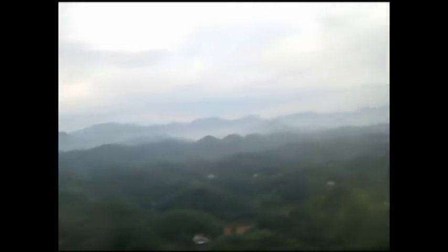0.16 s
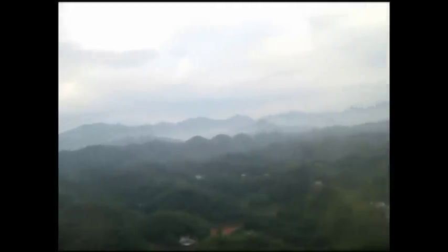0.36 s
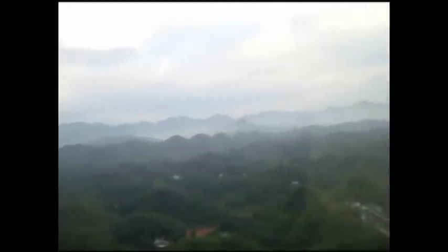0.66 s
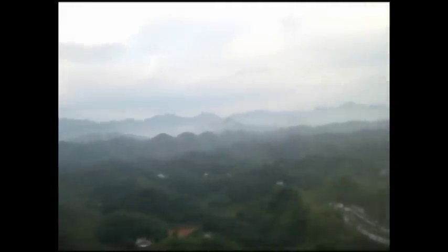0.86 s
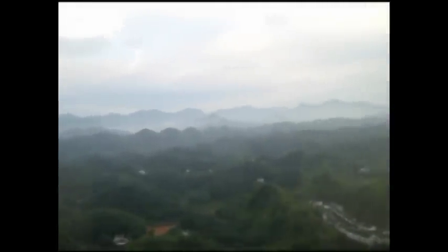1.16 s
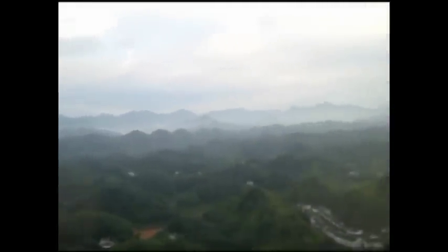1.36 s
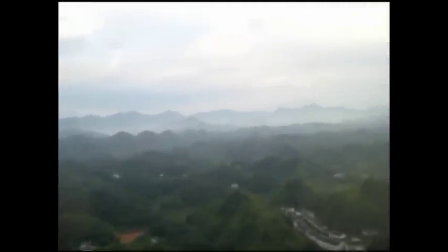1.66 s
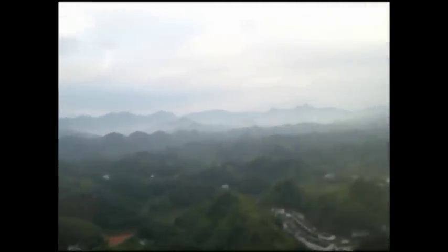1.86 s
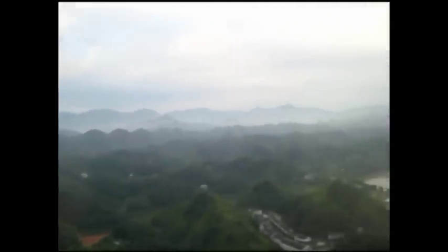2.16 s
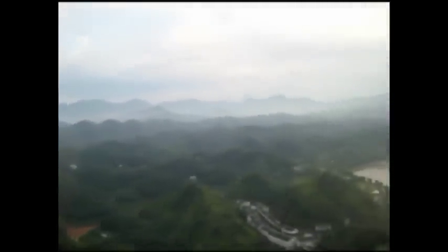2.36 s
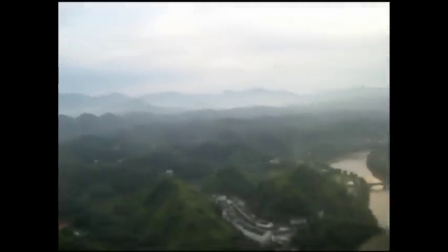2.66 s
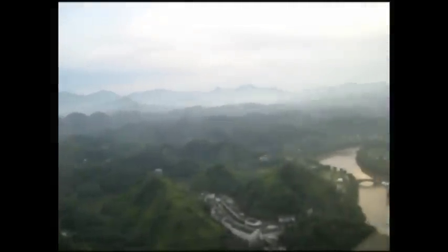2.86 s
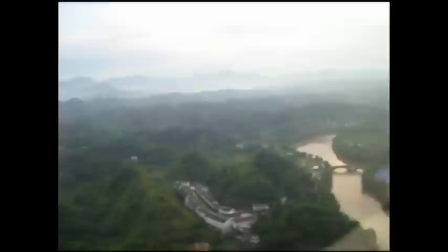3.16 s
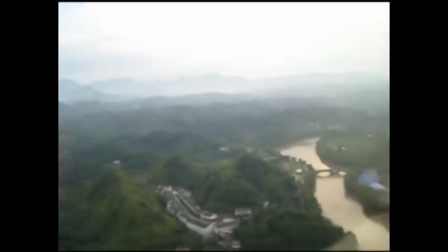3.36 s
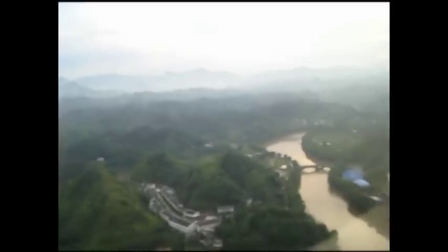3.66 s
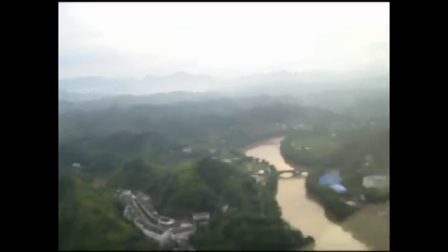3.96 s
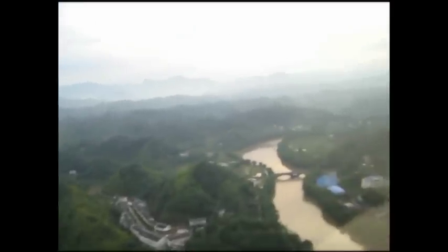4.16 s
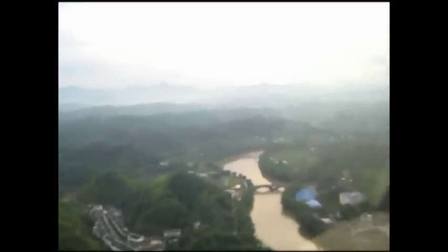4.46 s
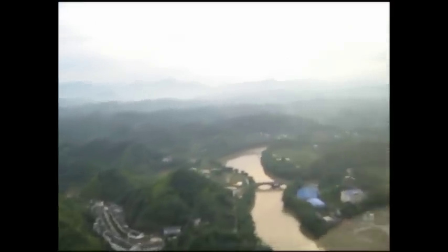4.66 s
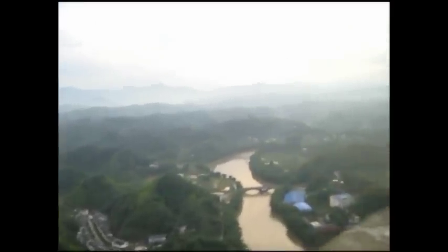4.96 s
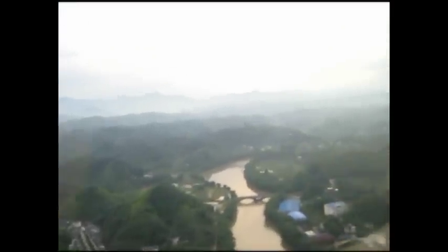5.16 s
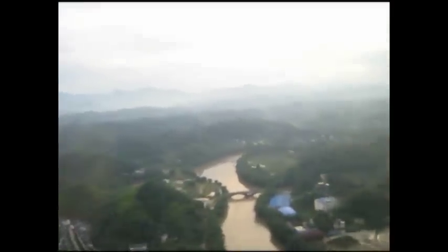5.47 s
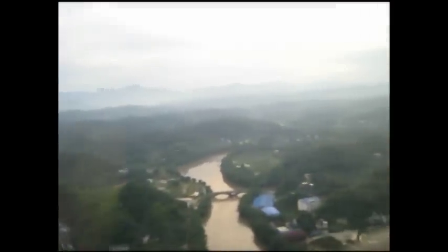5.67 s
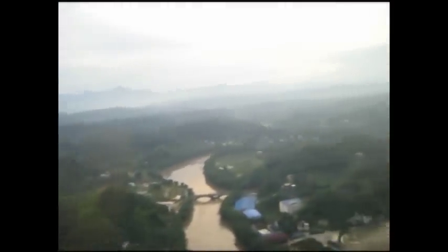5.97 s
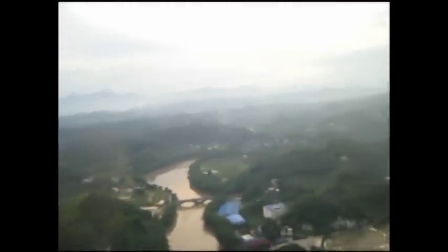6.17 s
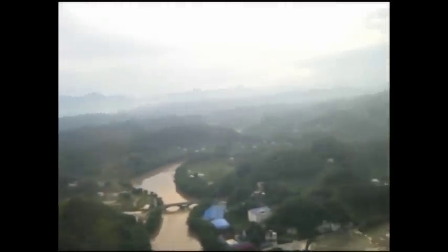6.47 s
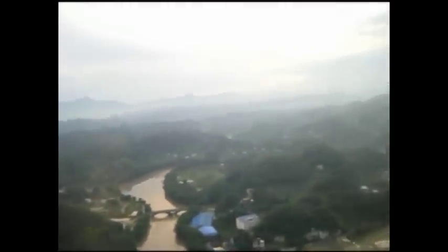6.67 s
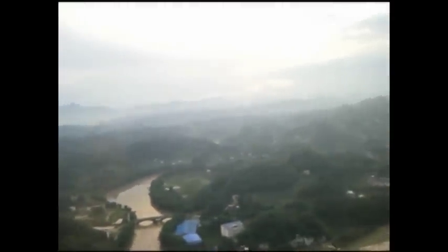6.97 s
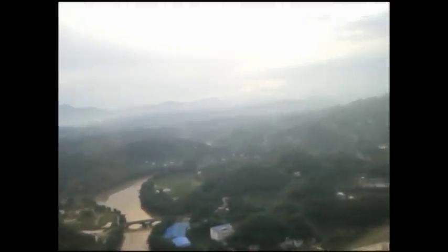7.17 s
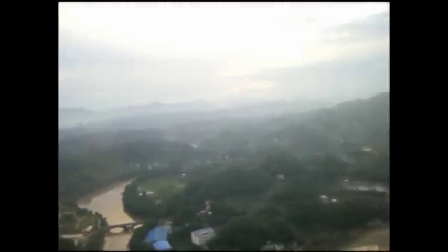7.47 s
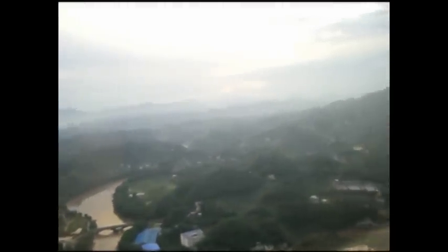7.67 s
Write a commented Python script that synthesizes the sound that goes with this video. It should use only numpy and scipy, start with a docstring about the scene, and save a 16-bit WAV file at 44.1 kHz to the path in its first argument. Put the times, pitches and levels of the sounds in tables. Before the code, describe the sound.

From 0 to about 8 seconds, one unbroken helicopter cabin drone in level flight, already running at the start and cut off while still steady. The overhead gearbox dominates: a hard, nearly pure whine just above 1 kHz, a weaker octave near 2.1 kHz, and a dense metallic cluster from about 600 Hz to 4.5 kHz, roughened by beating almost six times a second. Soft low rumble and a faint 23-per-second blade flutter lie underneath. Gear grind around 4 to 5 kHz is fuller from 1 to 5 seconds, then thins. Two thin turbine whistles near 10.7 kHz shimmer and waver within intake rush and pulsing hiss. As the microphone turns, separate tones swell and fade, shifting most around 5 to 6 seconds; from about 5.5 a small 3 kHz chirp recurs each rotor turn. Dry, close, mono; no voices.

```python
"""The overhead gearbox of a twin-turbine helicopter in level flight, heard in the cabin by one small microphone.
Its meshes and shafts are sines at fixed multiples of the rotor speed. The microphone is slowly turned, and two
cabin echoes make each strong tone swell and fade on its own. Four blades thump faintly as rotor-locked sines and
two compressors whine as wandering sines; behind them lies shaped noise: rumble, roar, grind, intake rush and hiss."""
import sys
import numpy as np
from scipy.fft import rfft, irfft, next_fast_len
from scipy.io import wavfile

SR = 44100
rng = np.random.default_rng(int(sys.argv[2]) if len(sys.argv) > 2 else 0)


def digitize_waveform(pressure):
    """Quantize a signal to 16-bit integers and store it at the path in sys.argv[1].

    Rows of a 2-D input are taken as channels; values are limited to [-1, 1].
    """
    field = np.atleast_2d(pressure).T
    bounded = np.clip(field, -1, 1)
    quanta = np.round(bounded * 32767).astype(np.int16)
    wavfile.write(sys.argv[1], SR, quanta)


N = 344862  # samples, about 7.8 s

# Strong tones of the planet stage. Each row: cycles per rotor turn, direct sound in dB, then for a near and
# again for a far echo: size over direct, lobes per sweep of the microphone, lobe at the start.
PLANETS = [(132.0, -37.6, 0.38, 0.29, 0.57, 0.11, 2.52, 0.93),
           (264.0, -39.1, 0.38, 1.62, 0.73, 0.23, 2.07, 0.13),
           (265.0, -34.8, 0.69, 1.1, 0.16, 0.26, 8.58, 0.93),
           (395.0, -33.6, 0.32, 0.91, 0.33, 0.19, 5.04, 0.51),
           (660.0, -45.0, 0.31, 0.9, 0.73, 0.17, 3.16, 0.89),
           (790.0, -50.5, 0.85, 1.3, 0.54, 0.55, 6.98, 0.25)]
# The turning microphone. Each row: time in seconds, how far it has turned as a share of the whole sweep.
TURN = [(0.0, 0.0), (0.46, -0.007), (0.92, -0.004), (1.38, -0.061), (1.84, 0.134), (2.3, 0.184),
        (2.76, 0.209), (3.22, 0.248), (3.68, 0.234), (4.14, 0.263), (4.6, 0.383), (5.06, 0.423),
        (5.52, 0.704), (5.98, 0.764), (6.44, 0.843), (6.9, 0.875), (7.36, 0.888), (7.82, 0.939)]
# Air and gear noise inside. Each row: time in seconds, grind in dB, intake in dB before trim and flutter.
AIR = [(0, -51, -47), (1.2, -45.4, -47.5), (2.4, -44, -48), (3, -48, -49), (4.6, -44.9, -49.5),
       (5.4, -53, -49.5), (6.2, -48, -48), (7.82, -58, -44.5)]
# Booming cabin modes. Each row: centre in Hz, width in Hz, boost in dB.
CABIN = [(94, 28, 2.5), (191, 54, 5.5), (264, 16, 4), (654, 77, 9.5), (843, 54, 3), (1014, 256, 8)]
# Fuzzy tones in the treble. Each row: centre in Hz, width in Hz, boost in dB.
WHISTLES = [(7300, 30, 11.5), (9100, 57, 9), (10760, 170, 4)]
MESH_HZ = 759.2  # mean tooth rate of the planet stage
# Loose teeth blur each multiple of the mesh. Each row: centre in Hz, width in Hz, boost in dB.
RATTLE = [(k * MESH_HZ, 60, 3.5) for k in range(2, 12)]


def amp(db):
    """Amplitude factor of a level in dB."""
    return 10 ** (np.asarray(db) / 20)


def curves(rows):
    """One value per sample for each column after the time."""
    seconds, *columns = np.transpose(rows)
    return [np.interp(np.arange(N) / SR, seconds, column) for column in columns]


def wobble(rate):
    """A random curve through normally distributed knots, rate of them a second."""
    knots = rng.standard_normal(int(N * rate / SR) + 2)
    return np.interp(np.arange(N) * rate / SR, np.arange(len(knots)), knots)


def tone(phase, db):
    """A sine of the given rms level."""
    return np.sqrt(2) * amp(db) * np.cos(phase)


def humps(modes, hz):
    """Gain in dB of bell-shaped resonances."""
    return sum(db / (1 + (2 * (hz - mid) / width) ** 2) for mid, width, db in modes)


def noise(spectrum, band, modes):
    """Coloured noise with rms 1 inside band (Hz), its resonances included."""
    m = next_fast_len(N)
    hz = np.fft.rfftfreq(m, 1 / SR)
    f, db = np.transpose(spectrum)
    slope_db = np.interp(np.log(hz + 1), np.log(f + 1), db, left=-120, right=-120)
    gain = amp(slope_db + humps(modes, hz))
    inside = (hz > band[0]) & (hz < band[1])
    band_rms = np.sqrt(np.sum(gain[inside] ** 2) / len(hz))
    return irfft(rfft(rng.standard_normal(m)) * gain, m)[:N] / band_rms


def rotor_angle():
    """Rotor angle in radians as the governor hunts; the planet mesh swells around angle zero."""
    # Each row: time in seconds, rotor turns per second.
    rotor = [(0.0, 5.7513), (0.49, 5.7516), (0.98, 5.7592), (1.47, 5.7607), (1.96, 5.7546), (2.44, 5.7503),
             (2.93, 5.746), (3.42, 5.7492), (3.91, 5.7545), (4.4, 5.7548), (4.89, 5.7484), (5.38, 5.7363),
             (5.86, 5.7483), (6.35, 5.7581), (6.84, 5.7568), (7.33, 5.7534), (7.82, 5.746)]
    return 1.6 + 2 * np.pi * np.cumsum(curves(rotor)[0]) / SR


def gearbox(angle):
    """Every mesh and shaft is geared to the rotor, so all tones drift in pitch together."""
    # Input gear mesh and 3 harmonics. Each row: cycles per rotor turn, direct sound in dB, then for a near and
    # again for a far echo: size over direct, lobes per sweep, lobe at the start.
    input_gear = [(183.423, -21.1, 0.2, 0.72, 0.79, 0.05, 2.68, 0.28),
                  (366.845, -29.3, 0.2, 0.92, 0.18, 0.07, 8.36, 0.59),
                  (550.268, -51.0, 0.53, 0.65, 0.44, 0.11, 4.01, 0.64),
                  (733.69, -44.9, 0.77, 0.77, 0.93, 0.28, 1.96, 0.53)]
    # Strong tones of pumps, fans and smaller gears, columns as for the input gear.
    drives = [(101.9, -35.2, 0.34, 0.64, 0.1, 0.07, 6.46, 0.77),
              (111.827, -38.6, 0.05, 4.3, 0.42, 0.2, 5.55, 0.49),
              (118.903, -39.6, 0.85, 0.55, 0.75, 0.28, 5.25, 0.04),
              (205.868, -39.2, 0.37, 0.8, 0.02, 0.26, 4.12, 0.63),
              (280.263, -39.8, 0.44, 0.99, 0.93, 0.17, 4.39, 0.18),
              (463.199, -35.4, 0.26, 1.56, 0.46, 0.12, 3.68, 0.5),
              (317.62, -42.8, 0.47, 1.65, 0.98, 0.37, 3.7, 0.89),
              (476.45, -45.1, 0.46, 1.71, 0.93, 0.13, 5.5, 0.06),
              (635.25, -50.5, 0.35, 1.4, 0.32, 0.22, 8.03, 0.24),
              (926.43, -53.3, 0.6, 1.1, 0.69, 0.41, 2.46, 0.21)]
    # Weak planet tones around the multiples of the mesh.
    # Each row: cycles per rotor turn, level in dB before trim, drift and shade.
    sidebands = [(135, -53.0), (266, -49.0), (268, -48.5), (269, -52.6), (270, -51.7), (273, -50.3),
                 (396, -46.5), (397, -56.4), (399, -46.8), (400, -50.4), (523, -54.1), (524, -56.4),
                 (525, -50.3), (526, -56.9), (527, -53.8), (529, -52.9), (530, -49.3), (531, -55.9),
                 (655, -55.6), (665, -53.0), (792, -59.2), (793, -53.5), (794, -56.8), (795, -54.5),
                 (920, -60.4), (925, -60.2), (930, -60.4), (1055, -57.6), (1057, -66.7), (1060, -69.4),
                 (1186, -72.4), (1187, -73.3), (1190, -72.2)]
    # Weak tones of shafts and smaller gears. Each row: cycles per rotor turn, level in dB before trim and drift.
    shafts = [(17.16, -51.7), (18.68, -46.1), (81.55, -51.8), (114.07, -48), (120.1, -50), (146.6, -46.8),
              (171.57, -49), (178.94, -49), (179.41, -50), (190.38, -46.3), (190.67, -47.5),
              (223.68, -43.2), (227.63, -49.1), (232.64, -47.2), (288.52, -50), (330.86, -44.6),
              (335.53, -52.3), (428.9, -48.5), (448.42, -53.9), (459.21, -53.4), (467.21, -52.1),
              (560.5, -57.7), (582.64, -58.8), (768.09, -56.4), (796.31, -56.2), (815.2, -56.5),
              (840.77, -61.7), (854.47, -56.0), (858.21, -58.1), (858.95, -61.2), (917.11, -52.8),
              (952.88, -60.2), (992.6, -66.8), (1100.54, -71.5), (1449.97, -76.9), (1454.97, -79.1),
              (372.5, -52), (504.5, -58)]
    # Size in dB of the slow random sway of the input gear, planet and drive tones, in that order.
    sway_db = [0.48, 1, 1.5]
    # neighbouring whole orders beat once a turn as the planets go round
    strong = sum(strong_tones(rows, angle, db) for rows, db in zip([input_gear, PLANETS, drives], sway_db))
    weak = weak_tones(sidebands, angle, drift_db=2.2, shade_db=8)
    weak = weak + weak_tones(shafts, angle, drift_db=2.5, shade_db=0)
    return strong + throb(angle) + chirp(angle) + weak


def strong_tones(rows, angle, sway_db):
    """Tones locked to the rotor with a little phase jitter, each placed in the cabin's standing waves."""
    total = 0
    for row, db in zip(rows, standing(rows)):
        jitter = 0.093 * wobble(40)  # radians
        total = total + tone(row[0] * angle + jitter, db + sway_db * wobble(2.56) + .5 * wobble(12))
    return total


def standing(rows):
    """Level of each tone in dB: direct sound and two echoes slip in and out of step as the microphone turns."""
    turn, = curves(TURN)

    def echo(size, lobes, start):
        return size * np.exp(2j * np.pi * (start + lobes * turn))

    levels = []
    for row in rows:
        strength = np.abs(1 + echo(*row[2:5]) + echo(*row[5:]))
        levels.append(20 * np.log10(strength + .02) + row[1])  # .02 keeps a null from falling silent
    return levels


def throb(angle):
    """The passing planets give the mesh tones companions in fixed step, so each swells and dips once a turn."""
    mesh_db, = standing(PLANETS[:1])
    quarter = np.pi / 2
    first = tone(131 * angle, mesh_db - 6)
    first = first + sum(tone(k * angle + quarter, mesh_db - 8) for k in (130, 133))
    # a quarter cycle ahead and behind: the swell of the second harmonic starts sharply and then trails off
    second = tone(262 * angle + quarter, mesh_db - 9)
    second = second + sum(tone(k * angle - quarter, -50 + 2 * wobble(1.5)) for k in (261, 263, 267))
    return first + second


def chirp(angle):
    """One planet sends a short blip of the mesh's fourth harmonic towards the microphone on every turn."""
    # Each row: time in seconds, level in dB at the top of the blip.
    blip = [(0, -60), (5.2, -60), (5.7, -31), (7, -38), (7.82, -31)]
    window = np.exp(5 * (np.cos(angle - 2.9) - 1))
    return window * tone(528 * angle, curves(blip)[0])


def weak_tones(rows, angle, drift_db, shade_db):
    """Rotor-locked tones, each with its own phase and slow drift; turning away dulls the high ones most."""
    away = curves(TURN)[0] - .5
    total = 0
    for order, db in rows:
        phase = order * angle + rng.uniform(0, 2 * np.pi)
        shade = shade_db * away * order / 1000  # shade_db: loss over the sweep per 1000 cycles per turn
        total = total + tone(phase, db - .7 + drift_db * wobble(1.5) - shade)
    return total


def blades(angle):
    """Four blades push on the roof in turn: a sine at the blade passage rate and its second harmonic."""
    # Each row: time in seconds, level of the blade passage in dB.
    thump = [(0, -42), (.89, -37), (1.4, -44), (2.1, -44), (2.7, -42), (3.9, -39.5), (6.3, -37),
             (7.82, -41)]
    second_db = -52 + 3 * wobble(2)
    return tone(4 * angle - 3.7, curves(thump)[0]) + tone(8 * angle, second_db)


def turbines(angle):
    """Two compressors hunt in speed; each blade passage shakes their whine and cuts a gap of varying depth."""
    # Each row: time in seconds, first whine in Hz, its level in dB before flicker, second in Hz, its level in dB.
    compressors = [(0, 10766, -40, 10791, -53), (.4, 10765, -49, 10790, -55), (1, 10763, -47, 10787, -50),
                   (1.26, 10762, -39, 10784, -49), (1.8, 10751, -39, 10773, -53),
                   (2.35, 10744, -39, 10764, -58), (2.85, 10743, -41, 10763, -47),
                   (3.3, 10751, -50, 10768, -47), (3.7, 10751, -45, 10769, -43),
                   (4.05, 10748, -56, 10763, -44), (4.5, 10741, -50, 10756, -46),
                   (4.85, 10741, -43, 10762, -45), (5.3, 10747, -49, 10776, -43),
                   (5.9, 10744, -43, 10795, -40), (6.3, 10738, -46, 10786, -41),
                   (6.56, 10738, -44, 10761, -46), (7.1, 10738, -43, 10762, -45),
                   (7.82, 10741, -42, 10763, -49)]
    first_hz, first_db, second_hz, second_db = curves(compressors)
    shake = .45 * np.sin(4 * angle)  # radians
    # a narrow peak once per blade, its timing a little uneven
    passing = ((1 + np.cos(4 * angle + .8 * wobble(12))) / 2) ** 13

    def whine(hz, db):
        gate = 1 - passing * np.clip(.7 + .8 * wobble(15), 0, 1.3)
        flicker_db = 2.4 + 2 * wobble(11) + 1.3 * wobble(60)
        phase = 2 * np.pi * np.cumsum(hz) / SR + shake + 0.38 * wobble(60)
        return gate * tone(phase, db + flicker_db)

    return whine(first_hz, first_db) + whine(second_hz, second_db)


def gear_grind():
    """Grind of the gears: a treble noise band peaked at the multiples of the mesh."""
    # Each row: frequency in Hz, relative density in dB per Hz.
    spectrum = [(3000, -40), (3900, 2), (4600, 7.5), (5300, 7), (6300, -15)]
    grind_db = curves(AIR)[0] + .6 * wobble(8)
    return amp(grind_db) * noise(spectrum, (3900, 5200), RATTLE)


def structure_roar():
    """Roar of the structure: broad noise through cabin modes, whistles and the rattle of loose teeth."""
    # Each row: frequency in Hz, relative density in dB per Hz.
    spectrum = [(300, -32), (600, -5.5), (1200, -1.5), (1700, 2.5), (1950, -0.5), (2500, -3.5),
                (3400, -8.5), (4400, -8.5), (5500, -15.5), (6800, -23), (7500, -33.5), (7850, -45),
                (8300, -58)]
    return amp(-47 + .3 * wobble(8)) * noise(spectrum, (3250, 3550), CABIN + WHISTLES + RATTLE)


def cabin_rumble():
    """Low noise that booms in the cabin modes."""
    # Each row: frequency in Hz, relative density in dB per Hz.
    spectrum = [(6, -40), (14, -14), (30, -1.5), (65, -6.5), (130, -5), (300, -3), (500, -6), (900, -13.5),
                (2000, -37)]
    return amp(-34.5 + .4 * wobble(2)) * noise(spectrum, (130, 500), CABIN)


def rotor_pulses(angle):
    """Two cosines that pulse the treble air, once a rotor turn and once a blade."""
    return np.cos(angle - 2.9), np.cos(4 * angle - 3.5)


def intake_rush(angle):
    """Air rushing into the intakes: high noise with whistles and rattle, swelling slightly with the rotor."""
    # Each row: frequency in Hz, relative density in dB per Hz.
    spectrum = [(7500, -47), (7900, -34), (8400, -23.5), (9500, -15.5), (10250, -12.5), (10550, -3.5),
                (10750, 0.5), (11200, -5), (11500, -9.5), (11900, -15), (12300, -21), (13000, -24),
                (14000, -36)]
    turn, blade = rotor_pulses(angle)
    intake_db = curves(AIR)[1] + .4 * turn + .3 * blade + .9 * wobble(9) - .7
    return amp(intake_db) * noise(spectrum, (11000, 12000), WHISTLES + RATTLE)


def downwash_hiss(angle):
    """Hiss at the top of the band, pulsed by the downwash once a turn and once a blade."""
    # Each row: frequency in Hz, relative density in dB per Hz.
    spectrum = [(9000, -30), (11800, -1), (13000, 0), (16500, -1)]
    turn, blade = rotor_pulses(angle)
    hiss_db = -57 + 1.5 * turn + 1.2 * blade + .8 * wobble(18) + .8 * wobble(50)
    return amp(hiss_db) * noise(spectrum, (12500, 15500), [])


def scene():
    """One microphone in the cabin feeds both channels."""
    angle = rotor_angle()
    cabin = gearbox(angle) + blades(angle) + turbines(angle)
    cabin = cabin + gear_grind() + structure_roar() + cabin_rumble()
    cabin = cabin + intake_rush(angle) + downwash_hiss(angle)
    return np.array([cabin, cabin])


def record(dry):
    """Nothing is kept above the band limit."""
    top_hz = 15735
    m = next_fast_len(N + SR // 4)
    keep = np.fft.rfftfreq(m, 1 / SR) < top_hz
    return irfft(rfft(dry, m) * keep, m)[:, :N]


dry = scene()
out = record(dry)
digitize_waveform(out)
```